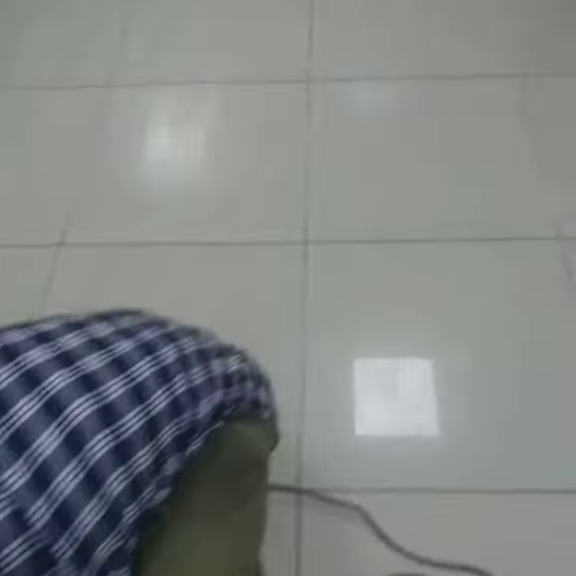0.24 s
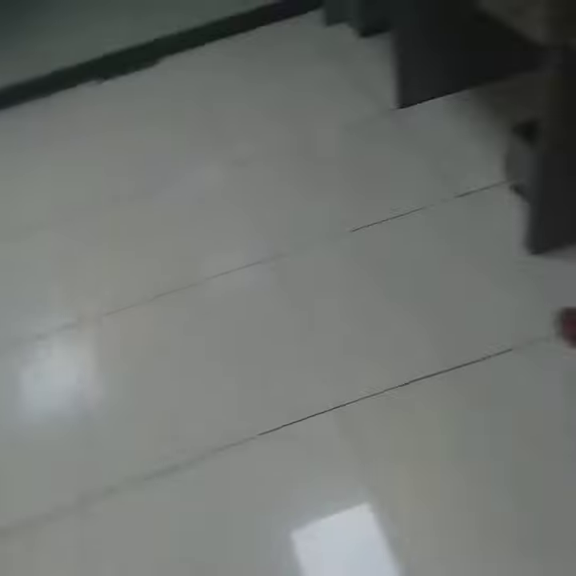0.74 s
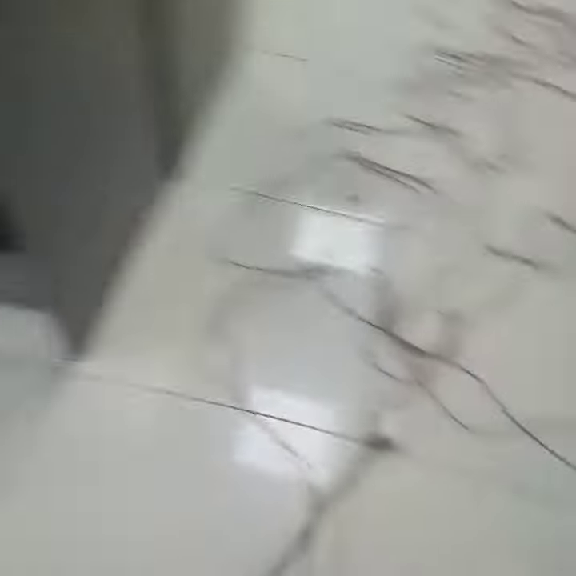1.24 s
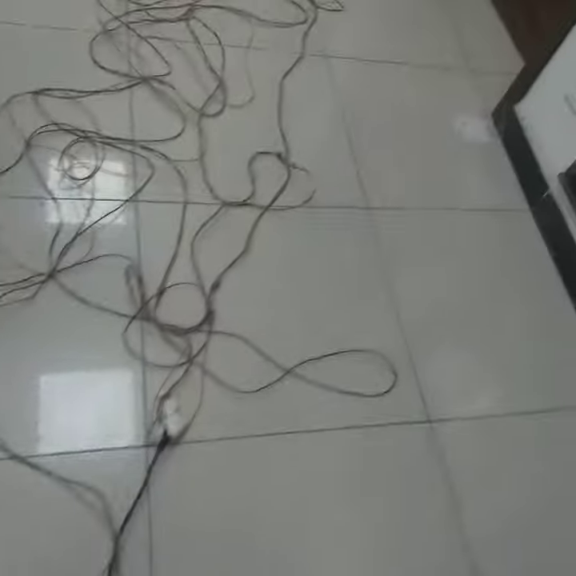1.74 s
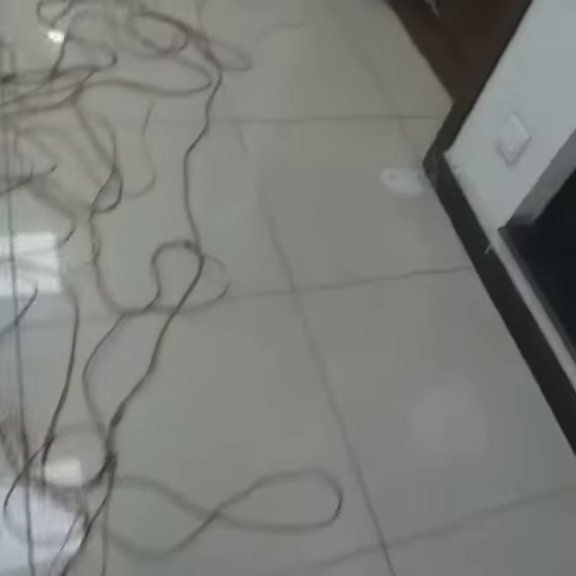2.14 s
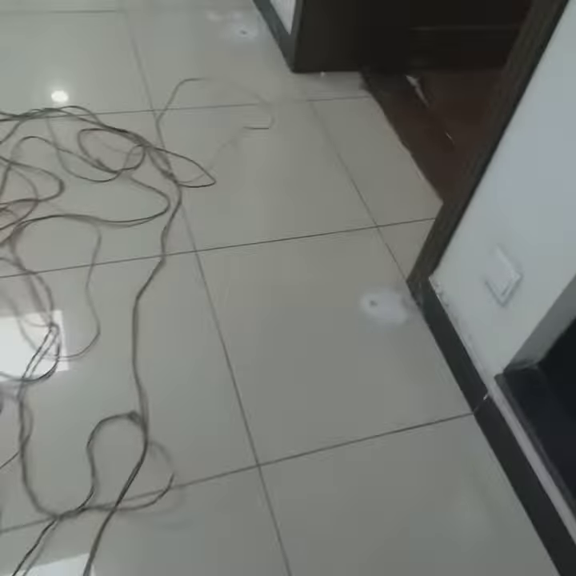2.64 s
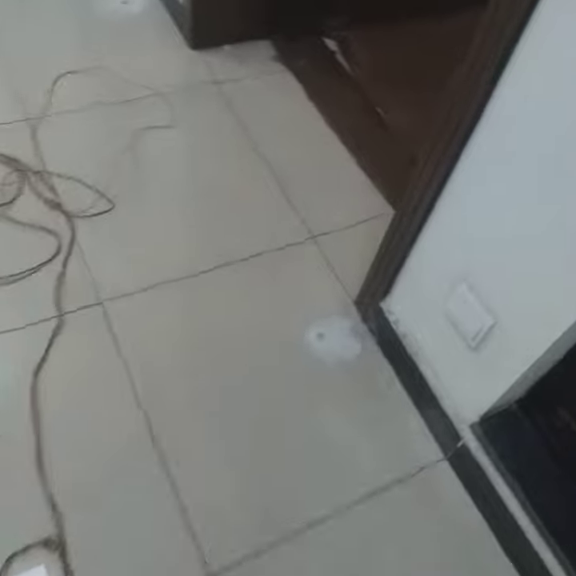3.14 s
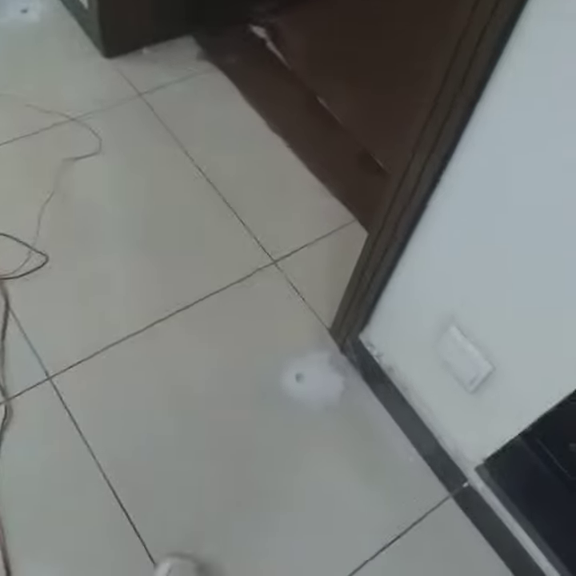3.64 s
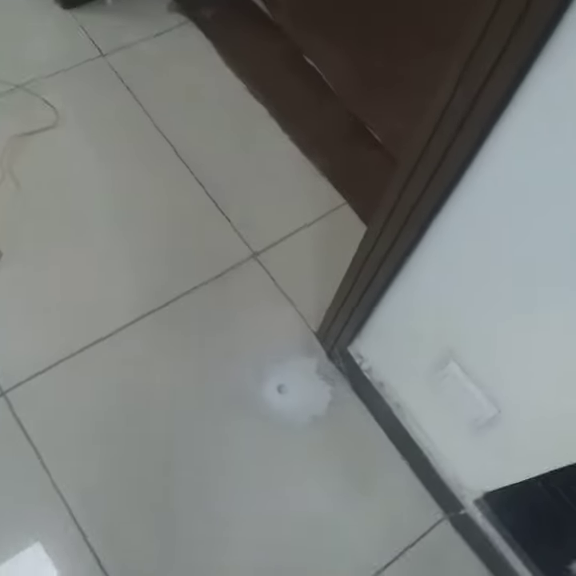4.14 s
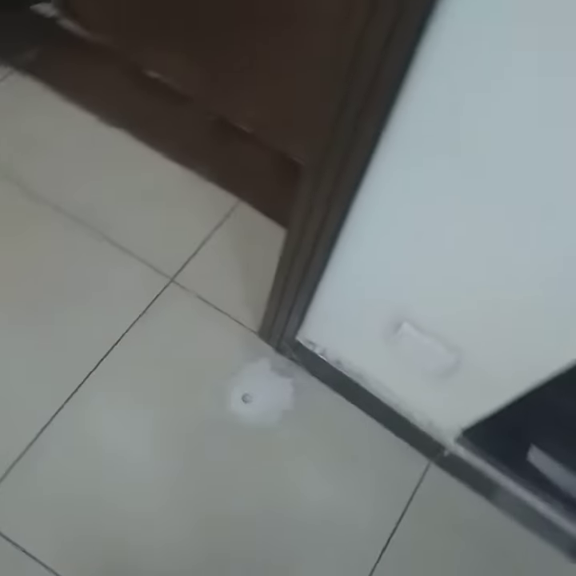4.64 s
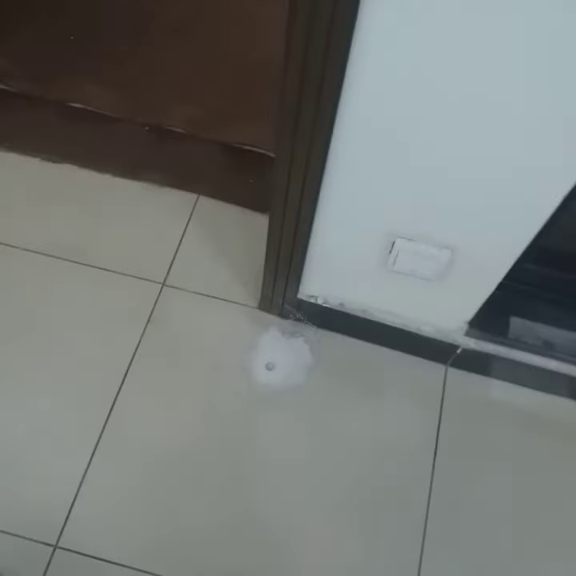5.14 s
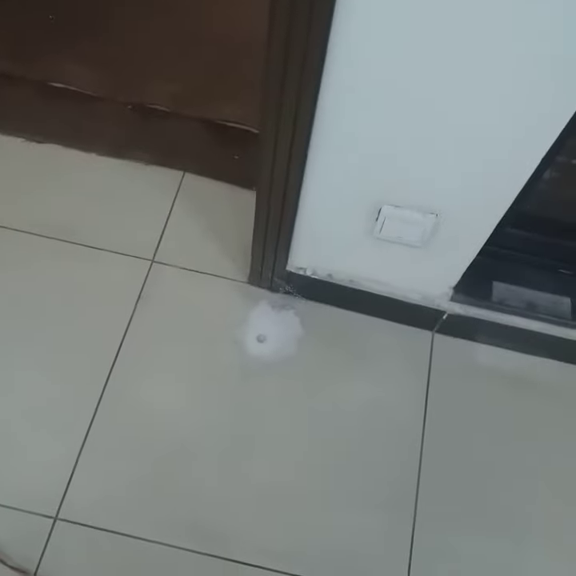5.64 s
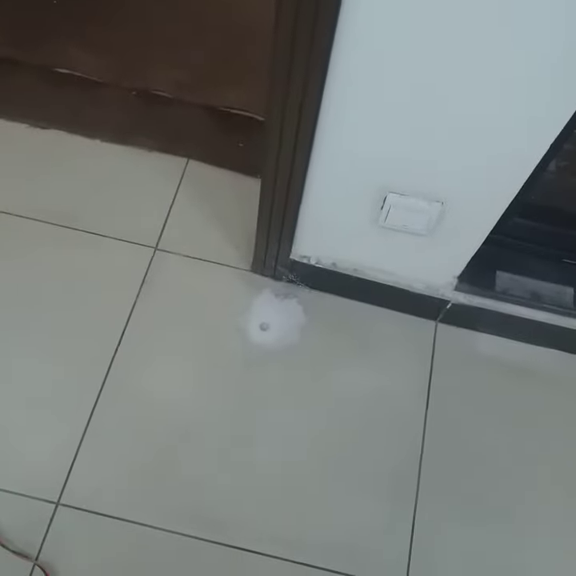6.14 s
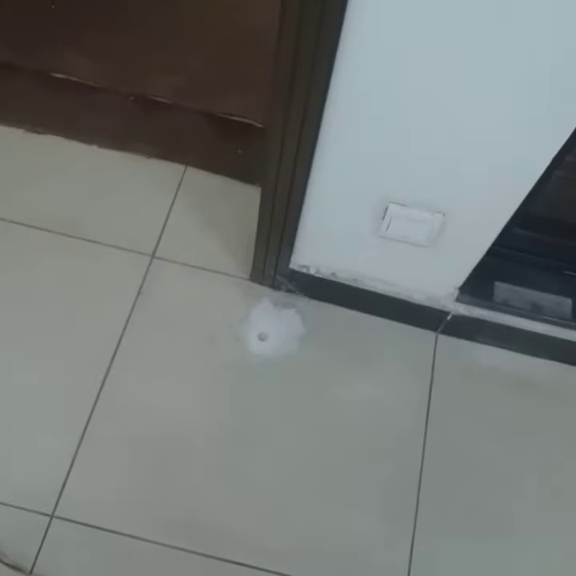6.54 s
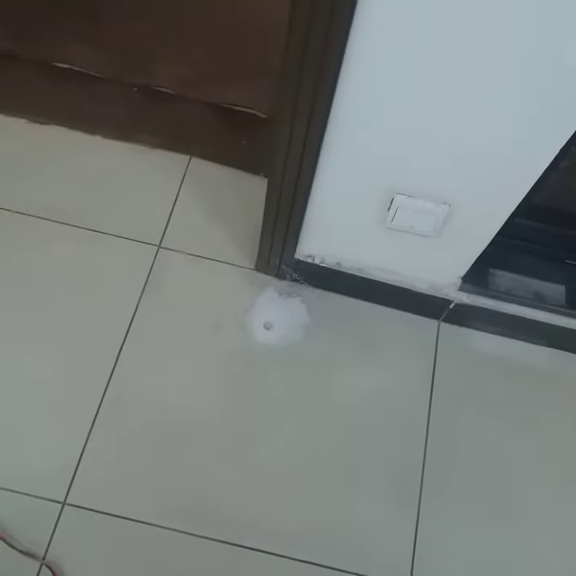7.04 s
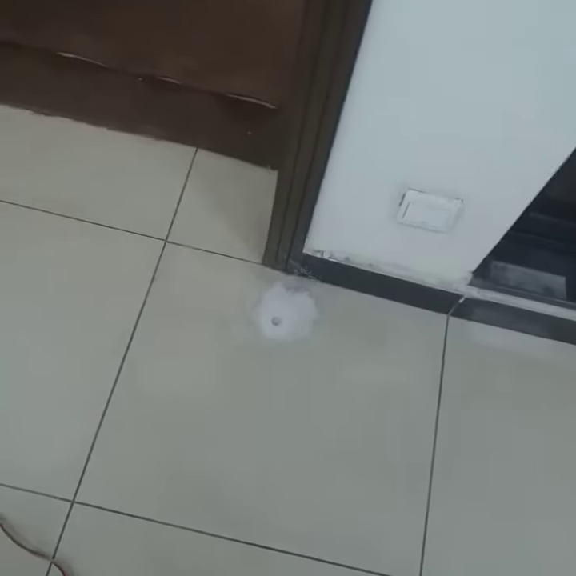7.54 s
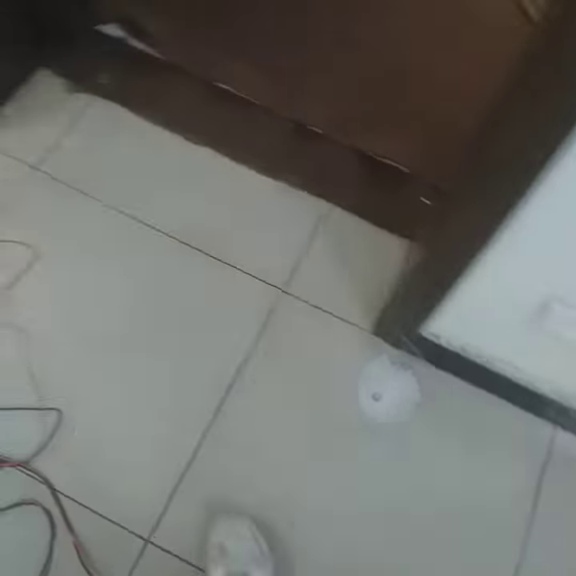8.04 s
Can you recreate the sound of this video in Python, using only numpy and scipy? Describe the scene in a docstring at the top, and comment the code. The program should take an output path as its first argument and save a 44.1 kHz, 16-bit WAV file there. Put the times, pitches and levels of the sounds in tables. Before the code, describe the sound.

Indoors, a power drill bores into tile with a rough roar and high squeals before its motor coasts down.

```python
"""A corded drill whines and roars into floor tile, its bit squealing, in a hard-walled room.
The listener walks away; later the drill coasts down. The motor's spinning core (the armature) sets the
pitch of the whine: its wobble, gear teeth, electrical contact bars and fan each make tones. Grinding
and cooling air make the roar. When the bit binds, it squeals once per turn of the chuck that holds it.
As the drill fades, one hears a few fuzzy ringing tones, a low room rumble and a soft scuff."""
import sys
import numpy as np
from scipy import signal
from scipy.io import wavfile
from scipy.ndimage import uniform_filter1d

SR = 44100
rng = np.random.default_rng(int(sys.argv[2]) if len(sys.argv) > 2 else 0)


def materialize(psi):
    """Save the field psi as 16-bit PCM at rate SR to the path in sys.argv[1].

    A 1-D psi becomes a single channel; in a 2-D psi each row is a channel.
    """
    bounded = np.clip(np.atleast_2d(psi).T, -1, 1)
    quanta = np.round(bounded * 32767).astype(np.int16)
    wavfile.write(sys.argv[1], SR, quanta)


N = 366030

# How fast the motor spins under power: (time [s], speed [turns/s])
POWERED_SPEED = [(0, 457.2), (.3, 460.8), (.75, 466.4), (1.35, 469.8), (1.9, 472.2), (2.1, 467.6),
                 (2.55, 445.6), (2.72, 443.2), (3.0, 446.3), (3.15, 443.8), (3.3, 436.7), (3.5, 435.2),
                 (3.75, 437.2), (4.05, 442), (4.5, 446.3), (4.65, 444.6), (5.12, 434.6), (5.2, 437.5),
                 (5.3, 454), (5.38, 463), (5.45, 454), (5.6, 412.9)]
def motor_speed(t, friction=74.2, drag=8.36e-4):
    """Turns per second. With the power off, each second takes away friction + drag * speed squared."""
    off_s, off_speed = POWERED_SPEED[-1]
    balance = np.sqrt(friction / drag)  # at this speed, bearings and fan brake equally
    slowing = np.sqrt(friction * drag) * np.maximum(t - off_s, 0)
    coasting = balance * np.tan(np.arctan(off_speed / balance) - slowing)
    return np.where(t < off_s, follow(POWERED_SPEED, t)[0], coasting)

def motor_spin():
    """The speed, smoothed because a heavy core cannot change pace at once, and the turns made so far."""
    speed = uniform_filter1d(motor_speed(np.arange(N) / SR), size=1500, mode="nearest")
    return speed, np.cumsum(speed) / SR

# An "order" counts vibrations per motor turn. Levels rise and dip as the listener passes
# the room's loud and quiet spots.
# Hum of the off-balance core: (time [s], order 1 level [dB], order 2 level [dB])
WOBBLE_HUM = [(0, -42, -54), (.3, -39, -30.5), (.52, -36, -43), (.7, -39, -38.5), (1.0, -52, -30),
              (1.6, -41.5, -28.5), (1.85, -51, -22.5), (2.2, -46, -32.5), (2.5, -59, -31.5),
              (2.9, -39.5, -36), (3.25, -42, -29), (3.5, -42, -32), (3.9, -37.5, -31.5), (4.15, -63, -27.5),
              (4.45, -44, -25.5), (4.9, -34, -33.5), (5.2, -35, -33), (5.4, -33.5, -23), (5.7, -47.5, -41),
              (6.0, -42, -37), (6.25, -63, -42), (6.9, -60, -48.5), (7.3, -86, -54), (8.3, -62, -62)]
# Whistles of the contact bars and fan: (time [s], bar level [dB], fan level [dB])
BAR_AND_FAN = [(0, -44, -42), (.4, -48, -40), (.9, -60, -39), (2.1, -47, -44), (2.21, -54, -27),
               (2.35, -49, -40), (3.3, -47, -38), (4.2, -51, -33), (4.65, -40, -33), (5.1, -46, -38),
               (5.4, -44, -38), (5.75, -51, -44), (5.95, -54, -40), (6.1, -41, -57), (6.22, -32, -45),
               (6.4, -40, -55), (6.75, -45, -41), (6.9, -48, -36), (7.0, -39, -39), (7.4, -43, -53),
               (7.7, -42.5, -44), (8.3, -44, -64)]
def motor_tones(t):
    """The core wobbles, and 24 bars and 34 fan blades pass each turn. Gives {order: dB}."""
    return dict(zip((1, 2, 24, 34), follow(WOBBLE_HUM, t) + follow(BAR_AND_FAN, t)))

# Main tone of the gear teeth meeting: (time [s], order 5 level [dB])
GEAR_TEETH = [(0, -27), (.18, -39), (.5, -29), (.65, -39.5), (1.0, -38.5), (1.17, -26.5), (1.44, -28),
              (1.53, -36), (1.72, -22.5), (1.89, -25.5), (1.98, -22.5), (2.45, -24), (2.6, -19.5),
              (2.74, -26.5), (2.98, -14), (3.08, -24), (3.3, -21.5), (3.43, -39), (3.52, -14.5),
              (3.7, -15.5), (3.79, -28.5), (3.9, -19), (3.98, -36), (4.06, -20.5), (4.16, -22), (4.23, -26),
              (4.32, -14), (4.42, -23), (4.54, -15), (4.76, -24.5), (4.87, -19), (4.97, -36), (5.2, -20.5),
              (5.35, -49), (5.5, -70)]
# More tones of the straining gears: (time [s], order 4 [dB], order 10 [dB], order 15 [dB])
GEAR_STRAIN = [(0, -37, -28, -47), (.3, -38, -38, -47), (.55, -31.5, -33, -46), (.85, -38.5, -43, -48),
               (1.35, -36, -34, -51), (1.85, -26, -37, -44), (2.05, -23.5, -33, -33),
               (2.5, -25.5, -39, -34), (3.05, -32, -33, -35), (3.3, -32.5, -36, -32), (3.55, -24, -42, -35),
               (3.9, -33, -32, -35), (4.35, -39, -37, -28.5), (4.6, -33, -36.5, -43), (5.05, -36, -42, -28),
               (5.25, -38, -34, -38), (5.45, -60, -60, -60)]
def gear_tones(t, load_db):
    """Teeth push on teeth and sing while the drill works. Gives {order: dB}."""
    levels = follow(GEAR_TEETH, t) + [db + load_db for db in follow(GEAR_STRAIN, t)]
    return dict(zip((5, 4, 10, 15), levels))

def brush_and_side_tones(t, speed, load_db):
    """Brushes clatter over the bars, beside fainter tones; all follow the roar. Gives {order: dB}."""
    roar_db = follow(ROAR_SHAPE, t)[0]
    clatter_db = -9 * np.clip((speed - 140) / 140, 0, 1)  # stands out as the air noise dies
    tones = {k: db + clatter_db for k, db in zip((48, 60, 72, 84, 96), (-7, -8, -2, -6, -7))}
    tones |= {k: db + load_db for k, db in zip((7, 9, 12, 14, 16), (-19, -22, -21, -20, -18))}
    return {k: roar_db + db + colour_db(k * speed, t) for k, db in tones.items()}

def whine(waver=0.19, chatter=0.52, hum_swell=0.2, swell=0.93, swell_hz=9, load_off_s=5.3):
    """Tones at multiples of the motor's speed, blurred by slack in the gears and brushes."""
    speed, turns = motor_spin()
    slowing = np.clip(uniform_filter1d(-np.gradient(speed) * SR, size=8000) / 80, 0, 1)
    step = 16  # samples between loudness updates
    at, speed = np.arange(0, N, step), speed[::step]
    t = at / SR
    load_db = -40 * (t > load_off_s)
    motor, gears = motor_tones(t), gear_tones(t, load_db)
    out = np.zeros(N)
    for order, db in (motor | gears | brush_and_side_tones(t, speed, load_db)).items():
        height = 1 + waver * slow_noise(len(t), step * 25 * np.sqrt(order))
        height += chatter * (order in gears) * slow_noise(len(t), step * 14)  # teeth press and let go
        depth = hum_swell if order in motor or order == 5 else swell
        height += depth * slow_noise(len(t), step * swell_hz)  # loud and quiet spots pass by
        height *= np.sqrt(2) * gain_of(db) * (order * speed < .45 * SR)
        tone = np.exp(2j * np.pi * (order * turns + rng.random()))
        out += (np.interp(np.arange(N), at, height) * tone).real
    return (1 - .4 * slowing) * out + room_echo(slowing * out)  # falling tones leave a trail

# The roar's balance of low and high:
# (frequency [Hz], close by [dB], across the room [dB], coasting [dB])
ROAR_COLOUR = [(40, -64, -47, -26), (110, -36.5, -31, -14), (204, -32.5, -33.5, -13.5),
               (440, -31, -20, -8.5), (656, -20.5, -17, -7.5), (1070, -15.5, -15, -5.5),
               (2060, -8.5, -7, -6), (2700, -13, -10, -4), (4920, -3, -5.5, -2.5),
               (5640, -14.5, -1.5, -1.5), (7360, -12, -8, -5), (8860, -30.5, -30, -27.5),
               (12400, -27.5, -27.5, -25), (15700, -27.5, -25.5, -30)]
def colour_db(hz, t):
    """How strong each frequency is next to the 2600-6200 Hz band; distance and speed change this."""
    table_hz, *columns = np.transpose(ROAR_COLOUR)
    log_hz, middle = np.log(table_hz), np.log(np.geomspace(2600, 6200, 9))
    curves = [np.interp(np.log(hz + 1), log_hz, db, left=-80) - np.interp(middle, log_hz, db).mean()
              for db in columns]
    return blend(t, *curves)

# Grinding and cooling air; the whirr is a broad hump in the noise:
# (time [s], relative level [dB], extra bass [dB], whirr [dB], extra treble [dB], whirr pitch [Hz])
ROAR_SHAPE = [(0, -23, 7, 3.5, 0, 1610), (.38, -25.5, 5, 7.5, 3.5, 1440), (.76, -26.5, 6, 4.5, 3, 1640),
              (1.29, -23.5, 1, 6.5, 4, 1700), (1.5, -21, -2.5, 7, 3.5, 1770), (1.96, -18, -2, 5, 5, 1900),
              (3.05, -20.5, -2, 6.5, 4, 1880), (3.81, -20, 1, 3.5, 6, 1780), (4.3, -20, 2, 5, 9, 1470),
              (4.74, -21, 1, 6, 8.5, 1570), (5.32, -19.5, 1.5, 5, 3, 1590), (5.66, -22, -1.5, 8.5, 2, 1480),
              (6.52, -29.5, -3, 10, 2.5, 1180), (6.8, -32, -.5, 7, 4, 1430), (7.0, -32, -2, 6, 2.5, 1200),
              (7.28, -33, 0.5, 6, 2, 1320), (7.58, -34, 3, 2, 2, 1520), (8.0, -40.5, 6, 6.5, 10, 1630),
              (8.3, -41, 6, 5, 10, 1800)]
# Pitches that the room and the drill's case favour: (pitch [Hz], base width [Hz], base boost [dB])
RESONANCES = [(139, 22, 2), (266, 23, -0.5), (354, 210, 3.5), (660, 23, 3.5), (815, 106, 2.5),
              (1018, 120, 2), (1180, 18, -3), (1490, 26, 0), (1686, 20, -4.5), (1692, 16, 9), (1880, 31, 1),
              (1810, 25, 2), (4440, 190, -3), (6180, 120, 1)]
# Dips where sound paths around the case cancel:
# (pitch [Hz], width [Hz], depth close by [dB], depth across the room [dB], depth coasting [dB])
CANCEL_DIPS = [(2600, 560, 0.5, 1.5, 2.7), (5570, 960, -0.5, 6.1, 7.5)]
def roar(patchy_db=0.5, ripple_db=2.5, flicker_db=0.16, whirr_octaves=0.33):
    """The grinding bit and rushing air make noise, which the drill's case and the room shape."""
    frames, hz = N // 256 + 5, np.fft.rfftfreq(1024, 1 / SR)[:, None]
    t = np.arange(frames) * 256 / SR
    level_db, bass_db, whirr_db, treble_db, whirr_hz = follow(ROAR_SHAPE, t)
    real, imag, patches, ripple = rng.standard_normal((frames, 513, 4)).T
    patches = unit_rms(uniform_filter1d(uniform_filter1d(patches, size=12, axis=0), size=12, axis=1))
    ripple = unit_rms(uniform_filter1d(ripple, size=70, axis=1))  # the room's narrow, slow peaks
    flicker = unit_rms(rng.standard_normal(frames))
    shape_db = colour_db(hz, t)
    for pitch, width, *depths in CANCEL_DIPS:
        shape_db -= blend(t, *depths, speed_drop=53) * np.exp(-2 * ((hz - pitch) / width) ** 2)
    shape_db += level_db + patchy_db * patches + ripple_db * ripple + flicker_db * flicker
    stirred = np.clip(whirr_db / 3.77, .2, 1.7)  # a stronger whirr brings out the peaks
    for pitch, width, db in RESONANCES:
        shape_db += stirred * db / (1 + (2 * (hz - pitch) / (width + 30)) ** 2)
    shape_db += whirr_db * np.exp(-.5 * (np.log2((hz + 1) / whirr_hz) / whirr_octaves) ** 2)
    shape_db += bass_db / (1 + (hz / 900) ** 4) + treble_db / (1 + (8600 / (hz + 1)) ** 12)
    spectrum = (real + 1j * imag) * gain_of(shape_db)
    return gain_of(-17) * signal.istft(spectrum, nperseg=1024, noverlap=768)[1][:N]

# The binding bit, one list per squeal: (time [s], level [dB], pitch [Hz], share that throbs [0-1])
SQUEALS = [
    [(0.0, -13, 7040, 0.4), (0.008, -10.5, 6970, 0.3), (0.102, -16.5, 7060, 0.3), (0.33, -13.5, 6820, 0.4),
     (0.372, -23, 6950, 0.04), (0.518, -28, 7160, 0.46), (0.56, -19, 6950, 0.35), (0.702, -31, 7180, 0.3),
     (0.78, -33, 7300, 0.4)],
    [(1.4, -35, 7230, 0.6), (1.47, -25, 7600, 0.6), (1.476, -16, 7570, 0.6), (1.526, -27, 7900, 0.65),
     (1.638, -19, 7520, 0.6), (1.776, -27, 7080, 0.4), (2.004, -21, 7000, 0.4), (2.222, -21, 6750, 0.56),
     (2.226, -28, 6950, 0.4), (2.3, -29, 6930, 0.6)],
]
def bit_squeal(rows, gear_ratio=5 / 48, sharpness=11.0, width_hz=500, octave_db=-19):
    """Rubbing makes the bit ring, hardest at one spot in each turn of the chuck."""
    at = np.arange(round(rows[0][0] * SR), round(rows[-1][0] * SR))
    level_db, hz, throb = follow(rows, at / SR)
    chuck_turns = motor_spin()[1][at] * gear_ratio + .39  # the offset sets where it binds
    bind = unit_rms(np.exp(sharpness * (np.cos(2 * np.pi * chuck_turns) - 1)))
    tone = np.sqrt(2) * np.cos(2 * np.pi * np.cumsum(hz) / SR) + .5 * band_noise(hz, width_hz)
    ring = (1 - throb) * band_noise(hz, width_hz) + throb * bind * tone
    ring += gain_of(octave_db) * (1 - throb + .6 * throb * bind) * band_noise(2 * hz, 1.3 * width_hz)
    out = np.zeros(N)
    out[at] = gain_of(level_db + 0.5) * ring
    return out

# Brief ringing as the drill coasts: (middle time [s], length [s], pitch [Hz], level [dB])
COASTING_RINGS = [(5.7, 0.51, 1697, -24.5), (6.5, .35, 1172, -35), (6.85, .4, 1560, -37),
                  (6.97, 0.12, 1060, -36), (7.2, .3, 849, -40)]
def coasting_rings(width_hz=45):
    """Fuzzy tones swell and fade, each at its own steady pitch."""
    t = np.arange(N) / SR
    return sum(gain_of(db) * np.exp(-(2 * (t - s) / length) ** 2) * band_noise(np.full(N, hz), width_hz)
               for s, length, hz, db in COASTING_RINGS)

# The room's three deep natural notes: (pitch [Hz], width [Hz], noisy share [0-1])
ROOM_NOTES = [(67.6, 2, 0.5), (84.5, 4.3, 0.73), (195.4, 33, 0.98)]
# Their levels between swells: (time [s], low note [dB], middle note [dB], high note [dB])
RUMBLE_LEVELS = [(0, -70, -61, -65), (1.3, -69, -68, -60), (2.2, -57, -54, -49), (2.9, -62, -53, -51.5),
                 (4.4, -61, -64, -57), (5.4, -61, -58, -61), (8.3, -51, -53, -70)]
# Swells added on top: (middle time [s], length [s], low note [dB], middle note [dB])
RUMBLE_SWELLS = [(2.78, 0.39, -49, -55), (3.43, 0.39, -52, -62), (4.2, .3, -60, -57), (4.7, 0.33, -61, -61),
                 (5.25, 0.27, -54, -60), (5.73, .3, -48, -55), (6.27, .25, -57, -61), (6.72, .45, -48, -62),
                 (7.12, 0.28, -60, -56), (7.5, .18, -42, -52), (7.75, .28, -48, -52), (8.3, .2, -47, -49)]
def room_rumble():
    """Noise stirs the room's deep notes, which swell and fade."""
    t, out = np.arange(N) / SR, np.zeros(N)
    levels = gain_of(follow(RUMBLE_LEVELS, t))
    for s, length, *db in RUMBLE_SWELLS:
        levels[:2] += gain_of(db)[:, None] * np.exp(-(2 * (t - s) / length) ** 4)
    for (hz, width_hz, noisy), level in zip(ROOM_NOTES, levels):
        height = np.sqrt(1 - noisy ** 2) + noisy * slow_noise(N, width_hz)
        out += np.sqrt(2) * level * (height * np.exp(2j * np.pi * (hz * t + rng.random()))).real
    return out

def scuff(start_s=6.615, rise_s=0.036, level_db=-29, band_hz=(3000, 7600)):
    """A scuff on the tile: a puff of bright noise that rises softly and dies away."""
    age = np.maximum(np.arange(N) / SR - start_s, 0) / rise_s
    band = signal.butter(6, band_hz, "bandpass", fs=SR, output="sos")
    hiss = unit_rms(signal.sosfilt(band, rng.standard_normal(N)))
    return hiss * gain_of(level_db) * age * np.exp(1 - age)

def room_echo(x, fade_60db_s=0.89):
    """Hard walls bounce the sound around, smearing it into a fading tail."""
    tail = rng.standard_normal(SR // 2) * gain_of(-60 * np.arange(SR // 2) / SR / fade_60db_s)
    return signal.oaconvolve(x, tail / np.linalg.norm(tail))[:N]

def blend(t, near, far, coasting, speed_drop=260, walk_s=(0.2, 3.66)):
    """Slides from near to far as the listener walks, then to coasting as the motor slows."""
    walked = np.clip((t - walk_s[0]) / (walk_s[1] - walk_s[0]), 0, 1)
    slowed = np.clip((430 - motor_speed(t)) / speed_drop, 0, 1)
    return (1 - slowed) * ((1 - walked) * near + walked * far) + slowed * coasting

def band_noise(hz, width_hz):
    """A fuzzy tone: a narrow band of noise that follows the pitch curve hz."""
    return np.sqrt(2) * (slow_noise(len(hz), width_hz) * np.exp(2j * np.pi * np.cumsum(hz) / SR)).real

def slow_noise(count, width_hz):
    """A smooth random wander (complex numbers, average power 1); wider means faster."""
    keep = np.exp(-np.pi * width_hz / SR)
    real, imag = rng.standard_normal((2, count))
    slow = signal.lfilter([1], np.convolve([1, -keep], [1, -keep]), real + 1j * imag)
    return slow / np.sqrt(np.mean(abs(slow) ** 2))

def follow(rows, t):
    """Joins a table's rows with straight lines and reads each column at the times t."""
    times, *columns = np.transpose(rows)
    return [np.interp(t, times, column) for column in columns]

def gain_of(db):
    """Turns decibels into a multiplier."""
    return 10 ** (np.asarray(db) / 20)

def unit_rms(x):
    """Scales a signal to an average power of 1."""
    return x / np.sqrt(np.mean(x ** 2) + 1e-20)

def scene():
    """All the sounds together, the same in both ears."""
    mono = whine() + roar() + room_rumble() + scuff() + coasting_rings()
    mono += sum(bit_squeal(rows) for rows in SQUEALS)
    return np.array([mono, mono])

def record(dry, top_hz=15760):
    """Flattens peaks near full scale, then cuts the highest treble."""
    lowpass = signal.firwin(511, top_hz, window=("kaiser", 9), fs=SR)
    return signal.oaconvolve(np.clip(dry, -.98, .98), lowpass[None], "same")

dry = scene()
out = record(dry)
materialize(out)
```